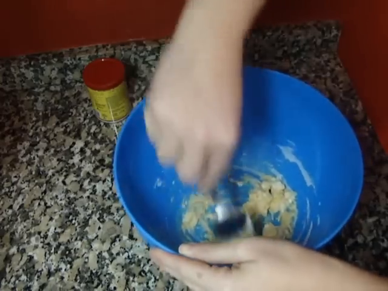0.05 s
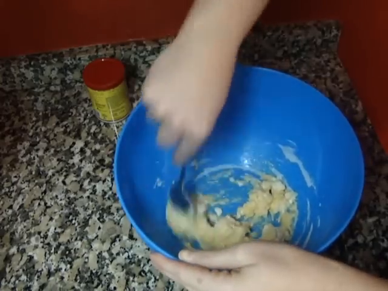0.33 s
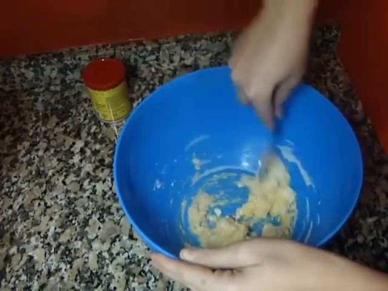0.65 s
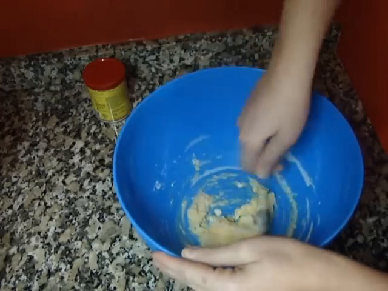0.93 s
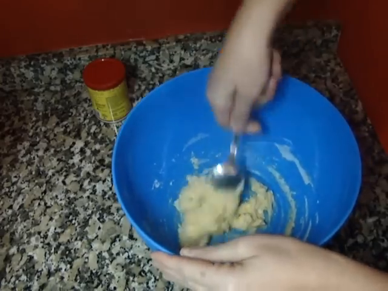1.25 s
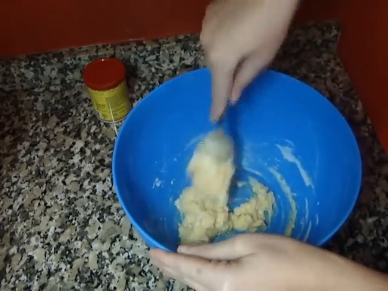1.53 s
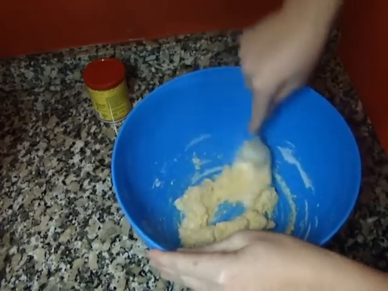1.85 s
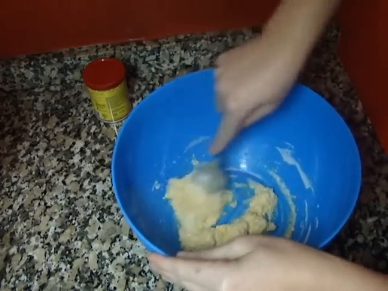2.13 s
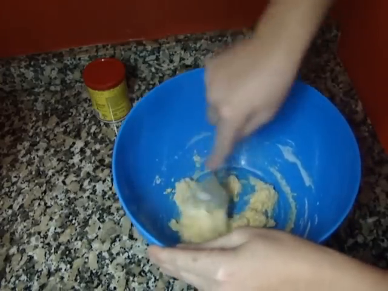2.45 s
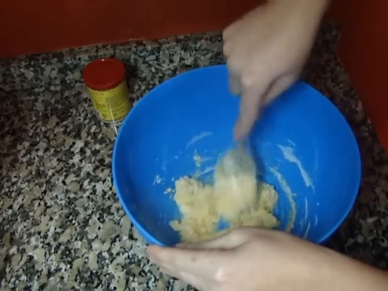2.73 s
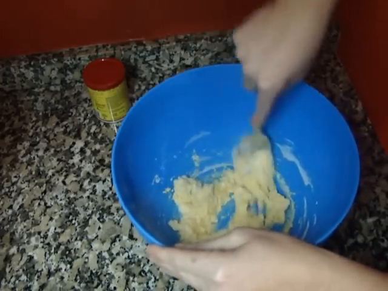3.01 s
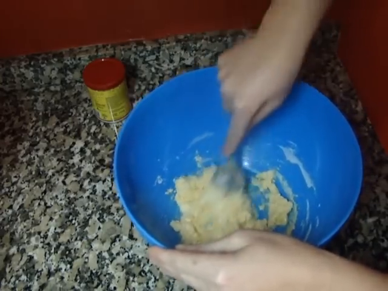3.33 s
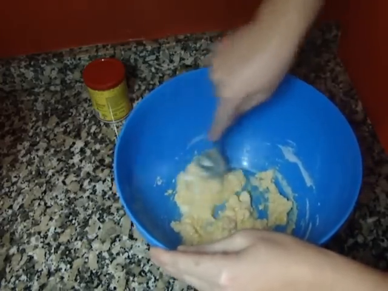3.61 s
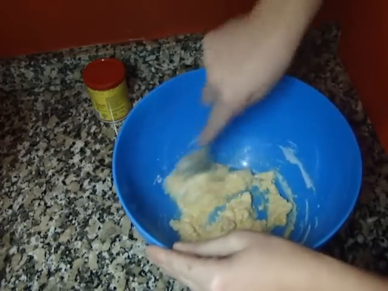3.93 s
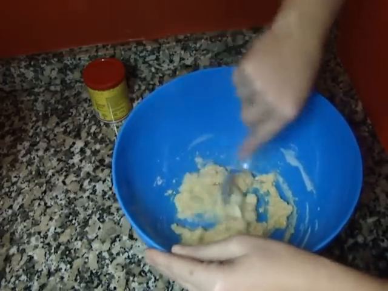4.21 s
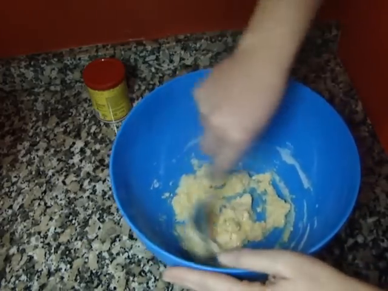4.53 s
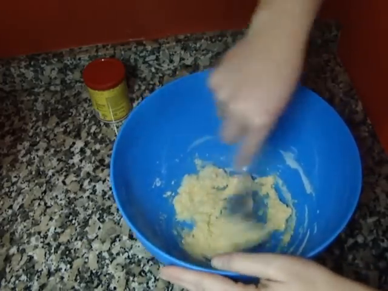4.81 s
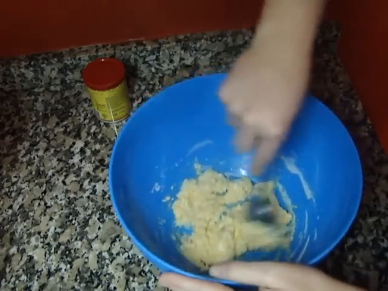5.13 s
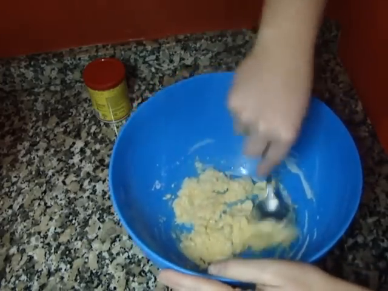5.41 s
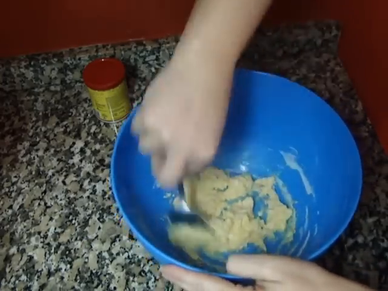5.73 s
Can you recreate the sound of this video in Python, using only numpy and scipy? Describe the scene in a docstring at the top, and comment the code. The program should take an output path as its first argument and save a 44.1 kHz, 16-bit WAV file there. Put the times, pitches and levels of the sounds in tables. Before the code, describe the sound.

A metal fork beats thick dough in a plastic bowl, heard close in a small kitchen. A quick cluster of hollow knocks fills the first half second, the loudest at about 0.4 seconds with a brief metallic clang. Rasping scrapes along the bowl wall follow until about 1.1 seconds. From there the mixing is lighter, with small clicks, short scrapes and the soft crackle of sticky dough, and clearer knocks near 2.2 and 2.5 seconds. The quietest stretch, from about 2.7 to 4 seconds, holds only gentle taps and dough sounds. Then the strokes grow firmer, with strong knocks around 4.5, 5, 5.3 and 5.6 seconds and scrapes between them, the tines squeaking slightly just before 6 seconds. A faint appliance hum and steady room noise continue throughout.

```python
"""A small hard kitchen: a metal fork beats thick dough in a plastic bowl held on a stone counter.
Blows ring the bowl's damped modes; hard ones make the fork clang. The tines stick and slip along
the wall, rasping and squeaking, while the sticky dough crackles and tears. Walls and counter
answer within milliseconds; an appliance hums faintly behind."""
import sys
import numpy as np
from scipy import signal
from scipy.fft import rfft, irfft, next_fast_len
from scipy.io import wavfile
from scipy.ndimage import uniform_filter1d, map_coordinates

SR = 44100
rng = np.random.default_rng(int(sys.argv[2]) if len(sys.argv) > 2 else 0)


def to_wav(s):
    """Save 16-bit WAV."""
    ch = np.atleast_2d(s).T  # columns
    pcm = np.round(np.clip(ch, -1, 1) * 32767)  # PCM
    wavfile.write(sys.argv[1], SR, pcm.astype(np.int16))


N = 262836

# Bowl modes, damped by hand and dough. Each row: frequency in Hz, level in dB, t60 in seconds.
BOWL_MODES = [(124.6, -22, 0.062), (180, -31, 0.18), (271, -26.5, 0.16), (307.6, -14, 0.17),
              (324.6, -9, 0.12), (368.8, -12.5, 0.14), (407.6, -9, 0.11), (464.8, -20, 0.58),
              (489, -8.5, 0.12), (516.2, 1.5, 0.075), (580, -2, 0.14), (646.8, -2, 0.15),
              (710, -21.5, 0.48), (792, -12.5, 0.091), (1015, -21, 0.2), (1086, -20, 0.043)]
# Spectra of bare steel contact and of sliding tines. Each row: frequency in Hz, density in dB.
TICK_SPECTRUM = [(500, -7.5), (2500, -1.5), (4500, 2), (7000, -2), (11500, -12)]
RASP_SPECTRUM = [(150, -50), (600, -3.5), (880, -9.5), (1100, -2), (1380, -12), (1800, -0.5), (2150, 3),
                 (2550, 0), (3200, -9), (5000, -19), (11000, -26)]


def knocks():
    """Steel hits plastic: the whole bowl rings, with a dull thud, a wall clack and a contact tick."""
    # Each row: start in seconds, level in dB, favoured frequency in Hz, then boom, clack and tick
    # in dB relative to the blow.
    blows = [(0.002, -29.5, 578, 3, -34.5, -34), (0.14, -23.5, 578, 6, -16, -45),
             (0.225, -15.5, 623, -2, -16, -35), (0.362, -4, 567, -30, -17, -53),
             (0.375, -14.5, 610, -28, -17, -50), (0.387, -8.5, 584, -8, -20, -56),
             (0.511, -8.5, 545, -16, -12, -44), (0.524, -36, 578, -5, -17, -3),
             (1.065, -18.5, 650, -12, -24, -43), (1.116, -28.5, 664, -1, -6, -34),
             (1.378, -40.5, 650, 7, -10.5, -20), (2.015, -24.5, 650, 4, -13.5, -38),
             (2.158, -12.5, 650, 5, -11, -36), (2.398, -36.5, 580, 11, -31, -15.5),
             (2.545, -17.5, 650, 1, -12.5, -31), (3.154, -26.5, 594, 7.5, -14, -38),
             (3.272, -29.5, 500, 5.5, -17.5, -38), (3.525, -30, 650, 5.5, -34, -19.5),
             (4.086, -18.5, 605, 8, -16, -30), (4.384, -34.5, 650, 6.5, -9, -17.5),
             (4.5, -11, 677, 4.5, -17, -51), (4.978, -10, 660, 1, -20, -22),
             (5.341, -8.5, 664, 4, -10.5, -49), (5.606, -9.5, 490, 1.5, -11.5, -29)]
    # Spectra of the thud and of the wall's crowded upper modes. Each row: frequency in Hz, density in dB.
    thud_spectrum = [(25, -38), (80, -43), (130, -42), (210, -44), (310, 4.5), (600, 20), (760, -3),
                     (1500, 6.5), (5000, -21)]
    clack_spectrum = [(100, -40), (500, -19), (850, -8.5), (1100, -2), (1400, -6), (2050, 1), (2500, -3),
                      (3200, -12), (4500, -19.5), (11000, -40.5)]
    out, t = np.zeros((2, N + SR)), np.arange(SR // 4) / SR
    for start_s, db, favoured_hz, boom_db, clack_db, tick_db in blows:
        blow = amp(-8.5) * bowl_ring(t, favoured_hz, boom_db)
        blow += amp(-16) * burst(t, thud_spectrum, rise_s=0.0076, t60_s=0.014)
        blow += amp(clack_db) * burst(t, clack_spectrum, rise_s=0.00063, t60_s=0.046) * pan_left(1.1)
        blow += amp(tick_db) * burst(t, TICK_SPECTRUM, rise_s=0.000097, t60_s=0.059)
        out[:, round(start_s * SR):][:, :len(t)] += amp(db) * blow
    return out[:, :N]


def bowl_ring(t, favoured_hz, boom_db, favour_db=3, scatter_db=1.5, rise_s=0.0022, damping=1.7):
    """Bowl modes after a blow: the struck spot favours some, the pressing fork damps them."""
    hz, db, t60_s = np.transpose(BOWL_MODES)[:, :, None]
    scatter, detune, offset, spread = rng.standard_normal((4, len(BOWL_MODES), 1))
    spot_db = favour_db * np.exp(-((hz - favoured_hz) / 40) ** 2) + boom_db * (hz < 430)
    phase = 2 * np.pi * hz * (1 + 0.0051 * detune) * t + 1.13 * offset
    attack = 1 - np.exp(-t / rise_s)
    envelope = attack * amp(db + spot_db + scatter_db * scatter - 60 * damping * t / t60_s)
    channels = [(envelope * np.sin(phase + side * 0.19 * spread)).sum(0) for side in (-1, 1)]
    return unit_onset(np.array(channels))


def scraping():
    """Stick-slip along the wall: the bowl drones, tines rasp, dough crackles, single strands pop."""
    settle_db, pop_db, pop_floor_db = -63, -9, -62  # the floors keep the dough going between pushes
    drag, rasp, crackle = pushes()
    grip_db = 1.2 * wobble(25) + 1.6 * wobble(70) + 1.5 * wobble(300)  # pressure varies lump to lump
    drone = drag * amp(grip_db / 2) * stereo(slips(per_s=830, spread_db=5), bowl_response)
    tine_slips = stereo(slips(per_s=2000, spread_db=2.2), colour(RASP_SPECTRUM))
    tines = rasp * amp(grip_db) * air_pockets(tine_slips)
    # Tearing dough. Each row: frequency in Hz, density in dB.
    dough_spectrum = [(400, -27), (1500, 5), (3500, 0.5), (5500, 0.5), (7500, -4.5), (10500, -4),
                      (12000, -11)]
    tears = stereo(slips(per_s=2600, spread_db=2.2), colour(dough_spectrum))
    dough = np.hypot(crackle, amp(settle_db)) * amp(grip_db) * air_pockets(tears)
    strands = stereo(slips(per_s=45, spread_db=4), colour(dough_spectrum))
    pops = np.hypot(amp(pop_db) * crackle, amp(pop_floor_db)) * strands
    return drone + tines * pan_left(1.3) + dough + pops


def pushes():
    """Drag, rasp and crackle envelopes: each push digs in, grips and tears harder, then eases off."""
    # Each row: start in seconds, length in seconds, then bowl drag, tine rasp and dough crackle in dB.
    strokes = [(0.0, .05, -42, -52, -52.5), (0.237, 0.071, -42, -44, -53),
               (0.341, 0.007, -52, -30.5, -38.5), (0.413, .075, -23.5, -32, -63),
               (0.505, 0.056, -36, -31, -33.5), (0.599, 0.089, -35.5, -31.5, -35),
               (0.823, 0.12, -40.5, -30.5, -45), (0.98, 0.16, -48, -40.5, -49.5),
               (1.184, 0.23, -56.5, -58.5, -54), (1.73, 0.034, -46.5, -51, -52),
               (1.825, 0.031, -49, -42, -49), (1.885, 0.013, -47, -41, -39), (2.192, 0.15, -47, -47, -48),
               (2.656, 0.035, -50.5, -45, -44), (2.965, .1, -56.5, -49, -46),
               (3.31, 0.03, -52.5, -52.5, -54), (3.407, 0.1, -59, -50.5, -50),
               (3.657, 0.28, -59, -59, -52.5), (4.157, 0.067, -41, -41, -46.5),
               (4.552, 0.11, -38.5, -40, -50), (4.651, 0.12, -39, -37, -46), (5.033, 0.1, -41, -37, -42.5),
               (5.208, 0.081, -54.5, -54.5, -49.5), (5.407, 0.053, -34, -33, -38),
               (5.699, 0.05, -34.5, -32, -38), (5.78, 0.11, -37.5, -37, -45.5),
               (5.898, 0.066, -41, -29.5, -36.5)]
    rise_db_per_s, fall_db_per_s = 263, 224
    growth_db = (0, 1, 1)  # per layer, over one push
    t, power = np.arange(N) / SR, np.zeros((3, N))
    for start_s, length_s, *levels_db in strokes:
        near = slice(max(int((start_s - 0.5) * SR), 0), int((start_s + length_s + 0.5) * SR))
        age_s = t[near] - start_s
        shape_db = rise_db_per_s * np.minimum(age_s, 0) - fall_db_per_s * np.maximum(age_s - length_s, 0)
        ramp = np.clip(age_s / length_s, 0, 1) - 0.5
        for layer, db in enumerate(levels_db):
            power[layer, near] += amp(db + shape_db + growth_db[layer] * ramp) ** 2
    return np.sqrt(power)


def bowl_response(hz):
    """Bowl modes as resonators under a continuous push."""
    total = 0
    for k, (mode_hz, db, t60_s) in enumerate(BOWL_MODES):
        width_hz = np.log(1000) / np.pi / t60_s
        total += (-1) ** k * amp(db) * 1j * hz / (mode_hz ** 2 - hz ** 2 + 1j * hz * width_hz)
    return total


def air_pockets(x, depth_db=3):
    """Pockets open and close in the dough, each a brief resonance."""
    spectra = signal.stft(x, nperseg=512)[2]
    patches = uniform_filter1d(rng.standard_normal(spectra.shape[1:]), size=3, axis=0)
    patches = uniform_filter1d(patches, size=4, axis=1)
    return unit(signal.istft(spectra * amp(depth_db * unit(patches)), nperseg=512)[1][:, :N])


def snaps():
    """A tine catches or a dough strand breaks, too briefly to ring the bowl."""
    # Each row: start in seconds, level in dB, brightness in dB.
    catches = [(0.5537, -6, -20), (0.813, -12.5, -29), (1.2948, -26, -7), (1.318, -38, 5),
               (1.8195, -20, -27), (1.88, -30, 3), (1.912, -13.5, -15), (2.745, -44.5, 8),
               (2.7606, -42, 12.5), (2.902, -43.5, 8), (3.083, -45, -3), (3.32, -33, -4),
               (3.5143, -34.5, 8), (3.805, -24, -13), (3.822, -29, -6), (3.899, -36, 4), (4.7554, -16, -5),
               (5.554, -21.5, -27), (5.7407, -20.5, 4)]
    out, t = np.zeros((2, N + SR)), np.arange(SR // 16) / SR
    for start_s, db, bright_db in catches:
        body = amp(-20.5) * burst(t, RASP_SPECTRUM, rise_s=0.00099, t60_s=0.042)
        tick = amp(bright_db - 18.5) * burst(t, TICK_SPECTRUM, rise_s=0.000097, t60_s=0.029)
        out[:, round(start_s * SR):][:, :len(t)] += amp(db) * (body + tick)
    return out[:, :N]


def fork_resonances():
    """Brief narrow resonances: the steel fork clangs on hard blows, the tines squeak as they scrape."""
    # Each row: peak time in seconds, swell sigma in seconds, centre in Hz, width in Hz, level in dB.
    clangs_and_squeaks = [(.3618, 0.0015, 2520, 300, -8), (.3623, 0.0029, 4670, 2150, -23.5),
                          (.526, 0.0019, 2180, 400, -21), (0.893, 0.0079, 2230, 890, -25),
                          (1.89, 0.016, 2220, 120, -34.5), (2.288, 0.012, 2560, 120, -37),
                          (3.747, 0.015, 2580, 900, -40.5), (4.68, 0.015, 2010, 150, -29.5),
                          (5.728, 0.023, 2190, 200, -29.5), (5.935, 0.019, 2167, 150, -21)]
    out, t = np.zeros((2, N + SR)), np.arange(-SR // 6, SR // 6) / SR
    for peak_s, sigma_s, centre_hz, width_hz, db in clangs_and_squeaks:
        resonance = lambda hz: (hz * width_hz / (centre_hz ** 2 - hz ** 2 + 2j * hz * width_hz)) ** 2
        ring = stereo(slips(per_s=6900, spread_db=0.5, size=len(t)), resonance)
        swell = np.exp(-(t / sigma_s) ** 2 / 2)
        out[:, round((peak_s + t[0]) * SR):][:, :len(t)] += amp(db) * swell * ring
    return out[:, :N] * pan_left(1.3)


def kitchen(x, delay_s):
    """Wall and counter reflections; a fresh tail per block stands for the fork moving about."""
    # Room decay. Each row: frequency in Hz, t60 in seconds.
    decay = [(150, 0.97), (500, 0.47), (2000, 0.27), (10000, 0.39)]
    out, block = np.zeros((2, N + SR)), SR // 3
    for start in range(0, N, block):
        hz, t, spectra = signal.stft(rng.standard_normal((2, SR // 2)), SR, nperseg=256)
        fade = amp(-60 * t / along(decay, hz)[:, None])
        tail = signal.istft(spectra * fade, SR, nperseg=256)[1]
        tail = stereo(tail, np.ones_like) / np.sqrt(tail.shape[1])
        answer = signal.fftconvolve(x[:, start:start + block], tail, axes=1)
        out[:, start + round(delay_s * SR):][:, :answer.shape[1]] += answer
    return out[:, :N]


def appliance_hum():
    """Low tones, slightly unsteady in level and phase."""
    # Each row: frequency in Hz, rms level in dB.
    tones = [(58, -104), (123, -77.5), (246, -60.5), (392, -60), (493, -62)]
    t, hum = np.arange(N) / SR, np.zeros(N)
    for hz, db in tones:
        peak = np.sqrt(2) * amp(db + 1.3 * wobble(17))
        hum += peak * np.sin(2 * np.pi * hz * t + 0.23 * wobble(12))
    return hum


def still_air():
    """Faint, steady room noise."""
    # Each row: frequency in Hz, density in dB.
    air_spectrum = [(25, 10), (60, -8.5), (90, -12.5), (180, -14), (240, -6.5), (420, -3), (600, -9),
                    (800, -6.5), (1300, -9), (2400, -11), (4000, -21), (12000, -22.5)]
    return amp(-48.5) * stereo(rng.standard_normal((2, N)), colour(air_spectrum))


def slips(per_s, spread_db, size=N):
    """Two trains of randomly timed impulses of varying size."""
    shape = (2, size)
    fires = rng.random(shape) < per_s / SR
    return fires * rng.choice([-1, 1], shape) * amp(spread_db * rng.standard_normal(shape))


def burst(t, spectrum, rise_s, t60_s):
    """Decaying noise: many close modes struck together."""
    envelope = (1 - np.exp(-t / rise_s)) * amp(-60 * t / t60_s)
    return unit_onset(stereo(rng.standard_normal((2, len(t))), colour(spectrum)) * envelope)


def stereo(pair, response):
    """Two unrelated signals, filtered and blended to left and right at rms 1."""
    # Each row: frequency in Hz, left-right correlation.
    correlation = [(100, -0.24), (300, 0.45), (600, 0.62), (1200, 0.25), (2500, 0.062), (5500, -0.077),
                   (11000, -0.13)]

    def blend(hz):
        angle = np.arccos(np.clip(along(correlation, hz), -1, 1)) / 2
        return response(hz) * np.array([np.cos(angle), np.sin(angle)])

    mid, side = filtered(pair, blend)
    return unit(np.array([mid + side, mid - side]))


def filtered(x, response):
    """x through a complex response, a function of Hz."""
    size = x.shape[-1]
    padded = next_fast_len(size + SR // 4)
    hz = np.fft.rfftfreq(padded, 1 / SR)
    return irfft(rfft(x, padded) * response(hz), padded)[..., :size]


def colour(spectrum):
    """Response of a (Hz, dB) table."""
    return lambda hz: amp(along(spectrum, hz))


def along(points, hz):
    """(Hz, value) points interpolated on a log axis."""
    knots_hz, values = np.transpose(points)
    return np.interp(np.log(hz + 1), np.log(knots_hz + 1), values)


def wobble(knots_per_s):
    """Smooth random curve."""
    knots = rng.standard_normal(int(N * knots_per_s / SR) + 4)
    return map_coordinates(knots, [np.arange(N) * knots_per_s / SR])


def amp(db):
    """Decibels to gain."""
    return 10 ** (np.asarray(db) / 20)


def pan_left(db):
    """Channel gains: left up, right down."""
    return amp([[db], [-db]])


def unit(x):
    """x at rms 1."""
    return x / np.sqrt(np.mean(x ** 2) + 1e-20)


def unit_onset(x):
    """x at rms 1 over its first 20 ms."""
    return x / np.sqrt(np.mean(x[..., :SR // 50] ** 2) + 1e-20)


def scene():
    """Fork and bowl in the kitchen; the briefest sounds arrive almost dry."""
    beating = knocks() + scraping()
    accents = snaps() + fork_resonances()
    room = kitchen(amp(-7) * beating + amp(-21) * accents, delay_s=0.006)
    return beating + accents + room + appliance_hum() + still_air()


def record(dry):
    """Small microphones lose the deep bass; full-scale clipping and a steep band limit follow."""
    bass_hz, top_hz = 105, 12000
    thin = signal.sosfilt(signal.butter(2, bass_hz, "highpass", fs=SR, output="sos"), dry)
    return filtered(np.clip(thin, -1, 1), lambda hz: 1 / np.sqrt(1 + (hz / top_hz) ** 160))


dry = scene()
out = record(dry)
to_wav(out)
```